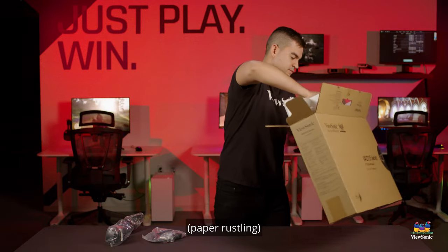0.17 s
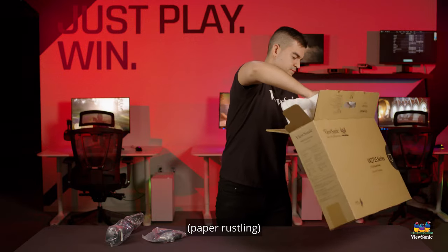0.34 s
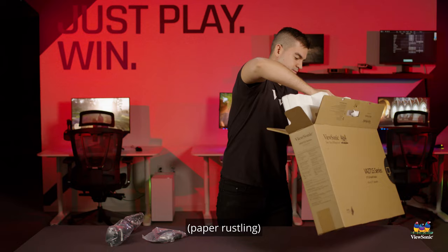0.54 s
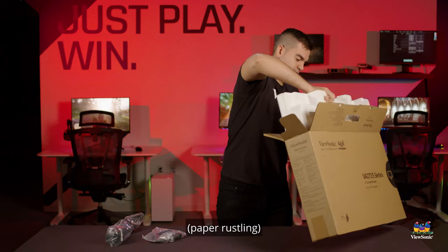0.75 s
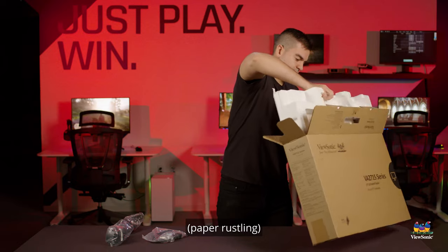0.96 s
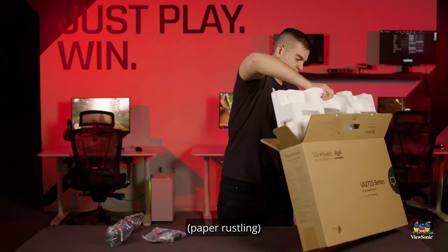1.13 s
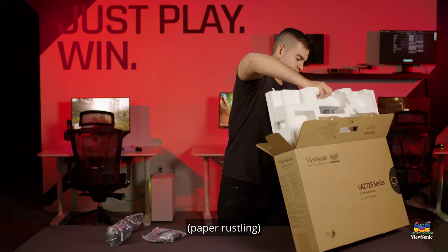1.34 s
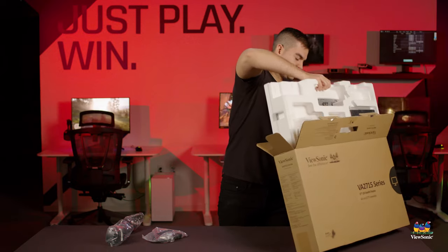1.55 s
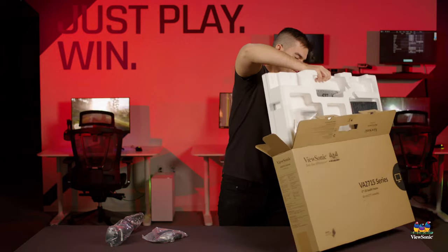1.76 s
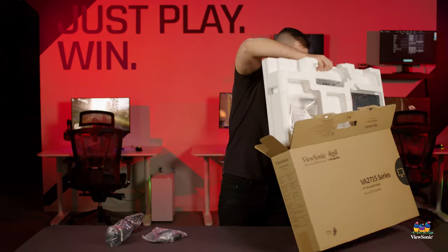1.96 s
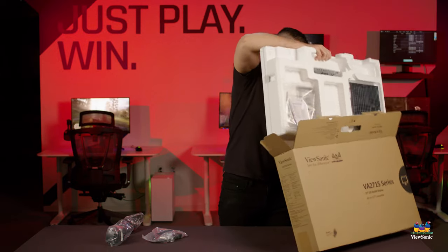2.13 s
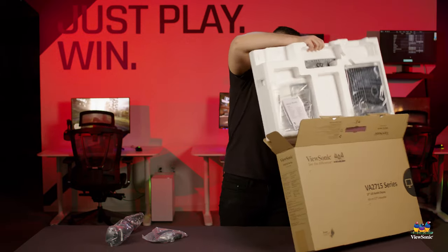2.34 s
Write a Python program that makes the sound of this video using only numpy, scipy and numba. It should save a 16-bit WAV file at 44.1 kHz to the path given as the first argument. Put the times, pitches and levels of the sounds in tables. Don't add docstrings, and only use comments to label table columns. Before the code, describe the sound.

Foam packing rubs and hisses as it slides out of a cardboard box, then a dull thump

```python
import sys
import numpy as np
from scipy import signal
from scipy.fft import rfft, irfft
from scipy.io import wavfile
from scipy.ndimage import uniform_filter1d
from numba import njit

SR = 44100
rng = np.random.default_rng(int(sys.argv[2]) if len(sys.argv) > 2 else 0)


def int16_out(signal):
    q = np.round(np.clip(np.atleast_2d(signal).T, -1, 1) * 32767)
    wavfile.write(sys.argv[1], SR, q.astype(np.int16))


def to_linear_factor(level_db):
    exponent = np.asarray(level_db, float) / 20
    return 10 ** exponent


N = 110250

# (time [s], level [dB], bead resonance strength [dB], sheen strength [dB])
FOAM_RUB = [(0, -33.5, -7, -3), (.22, -30, -5, -13), (.45, -32, -5.5, -8.5), (.8, -29, 4.7, -8),
            (1.12, -28.5, 2, -11.5), (1.2, -36, -7, -8), (1.25, -30.5, -11, -13), (1.28, -38, -4, -20),
            (1.31, -28, 2, -11.5), (1.54, -27.5, -5.5, -6.5), (1.6, -29.5, -2, -6.5),
            (1.69, -30, -10, -7.5), (1.73, -21.5, -6, -10), (1.78, -29, -25, -7), (1.919, -31.5, -25, -9),
            (2.03, -23, -1.5, -5), (2.105, -21, 3.5, -10), (2.13, -28.5, -3, -8), (2.19, -31, -23, -6),
            (2.23, -52, -16, -4)]
# (time [s], resonance [Hz])
BEAD_PITCH = [(0, 8900), (.18, 9900), (.7, 9230), (1.0, 9050), (1.64, 8850), (2.1, 9100)]
# (frequency [Hz], density [dB per Hz])
FOAM_TONE = [(4000, -17), (5000, -12), (6800, -5.5), (8500, -0.5), (10300, -3), (11500, -6), (15000, -13),
             (16000, -32)]
# (frequency [Hz], density [dB per Hz])
SHEEN_TONE = [(9500, -11.5), (11200, 1), (12200, -2), (13500, -2.5), (15300, -8), (16000, -24)]
# (time [s], resonance [Hz], strength [dB])
SHEEN_GLINT = [(0, 12800, -1), (.3, 11200, -15), (1.15, 11300, -16), (1.25, 12300, 2), (1.35, 11900, -10),
               (1.52, 12500, -2), (1.62, 11700, -8), (1.73, 11900, 4), (1.9, 11300, -3), (2.03, 12800, -8),
               (2.2, 12100, -6)]
# (time [s], level [dB], wall resonance [Hz])
CARD_SCRAPE = [(0, -40, 1900), (.45, -39, 1760), (.75, -34.5, 1780), (1.13, -38, 1850), (1.2, -42.5, 1850),
               (1.29, -42.5, 2120), (1.36, -37.5, 1940), (1.68, -37, 1940), (1.74, -34.5, 2060),
               (2.06, -35.5, 2300), (2.15, -44.5, 2280), (2.23, -48.5, 1980)]
# (frequency [Hz], density [dB per Hz])
CARD_TONE = [(300, -63), (1330, -24), (1560, -5.5), (2400, 0), (2900, -1), (3700, 2.5), (5000, -3),
             (7000, -5.5)]
# (time [s], level [dB], attack [s], hold [s], release [s])
FOAM_SCUFFS = [
    (2.3667, -34, 0.0027, 0.038, 0.034),
    (2.437, -32.5, 0.033, .06, .03),
]
# (frequency [Hz], density [dB per Hz])
SCUFF_TONE = [(590, -52), (1000, -30), (2080, -18.5), (2330, -9), (2650, -21), (3150, -14), (9720, -19.5),
              (11800, -1), (16000, -21)]
# (resonance [Hz], width [Hz], level [dB])
SCUFF_SQUEAKS = [
    [(8900, 470, -0.5), (13000, 900, -10), (10700, 900, -7)],
    [(2240, 120, -9), (7170, 300, -7), (8000, 390, -3)],
]
# (time [s], level [dB], card share [dB], crack centre [Hz], card ring [Hz])
FLAP_TICKS = [
    (0.218, -14, -16, 10600, 2000),
    (0.223, -17, -15, 9900, 2000),
    (.2255, -16.5, -2, 9800, 3270),
    (.2272, -19.5, -4.5, 9800, 1610),
    (.2295, -30, 4.5, 9900, 1380),
    (.24, -37, 14, 9000, 1370),
    (.2672, -12, -5.5, 8750, 1730),
    (.2712, -25.5, 5, 7800, 2280),
    (1.694, -30.5, 1.5, 4000, 1550),
    (2.366, -32, -21, 12000, 3220),
]
# (resonance [Hz], width [Hz], level [dB])
TICK_RATTLE = [(1420, 390, -4), (1960, 440, 3), (3100, 310, -1.5), (4360, 2300, -1.5)]
# (start [s], peak level [dB], pitch [Hz], swell [s], fade [s])
WALL_SWELLS = [(0.031, -48.5, 228, 0.09, 0.061), (0.226, -28.5, 190, 0.0032, 0.011),
               (.275, -30, 181, 0.007, 0.02), (0.269, -42, 90, 0.019, 0.031),
               (1.179, -30, 100, 0.024, 0.029), (1.284, -27.5, 116, 0.0021, 0.0066),
               (1.3185, -30.5, 116, .005, 0.0054), (1.359, -44.5, 190, 0.0083, 0.019),
               (1.735, -25.5, 339, 0.023, 0.021), (1.926, -22.5, 600, 0.0013, 0.007),
               (1.948, -37, 262, 0.0099, 0.012), (1.995, -31, 321, 0.0069, 0.0083),
               (2.021, -33, 238, 0.011, 0.005), (2.079, -26.5, 255, 0.018, 0.014),
               (2.155, -29, 264, 0.012, 0.011), (2.185, -27, 597, 0.0023, 0.011),
               (2.365, -33.5, 540, 0.0015, 0.0053), (2.36, -31, 116, 0.0056, 0.024),
               (2.41, -40.5, 721, 0.0036, 0.0085), (.227, -26.5, 520, 0.0026, 0.0047),
               (.27, -32, 780, 0.0034, 0.0034), (.002, -45.5, 570, 0.0098, 0.022),
               (.002, -49, 248, 0.013, 0.018), (.249, -33, 239, 0.0032, 0.0089),
               (.266, -27.5, 497, 0.0024, 0.0035), (1.254, -48, 180, 0.0079, .012),
               (1.284, -43, 320, 0.0028, .006), (1.297, -39, 226, .008, 0.0087),
               (1.335, -43, 186, .01, 0.017), (1.34, -50, 82, .015, 0.022), (1.801, -42, 355, 0.024, .03),
               (1.85, -51, 196, 0.012, 0.023), (2.125, -38.5, 574, .01, 0.019),
               (2.155, -39, 570, .008, .01), (2.384, -36, 100, 0.0056, 0.0097),
               (2.382, -41.5, 234, 0.0058, 0.055), (2.324, -29, 133, 0.0064, 0.0088),
               (2.2, -18, 75, 0.02, .04), (2.216, -24, 124, 0.012, 0.023), (2.27, -40.5, 401, 0.013, 0.024)]
# (time [s], level [dB])
CORNER_BUMPS = [
    (2.2001, -8.5),
    (2.212, -9.5),
    (2.223, -9.5),
    (2.236, -18.5),
    (2.249, -23),
    (2.28, -25.5),
    (2.3, -27),
]
# (frequency [Hz], level [dB], 60 dB decay [s])
BOX_MODES = [(65, -13, 0.11), (90, 2, 0.078), (104.5, -1.5, 0.13), (235.4, -2.5, 0.11), (304, -17, 0.13),
             (350, -8, 0.1), (408, -10, 0.085), (581, -15, 0.08), (716, -24.5, 0.06)]
# (frequency [Hz], density [dB per Hz])
SHUDDER_TONE = [(150, 0), (300, -1.5), (700, -12), (1200, -17.5), (2500, -23)]
# (time [s], wide walls [dB], narrow walls [dB])
WALL_HUM = [(1.67, -66, -50), (1.7, -69, -40.5), (1.76, -47, -41), (1.85, -55.5, -44.5), (1.95, -42, -52),
            (2.19, -38.5, -59), (2.3, -44.5, -78), (2.42, -48, -53), (2.5, -64, -54)]
# (resonance [Hz], width [Hz], level [dB])
WIDE_WALLS = [(190, 37, -10), (255, 62, 19), (327, 26, 3)]
# (resonance [Hz], width [Hz], level [dB])
NARROW_WALLS = [(597, 60, -6.5), (724, 750, 15), (814, 750, 4.5)]
# (frequency [Hz], level [dB])
ROOM_TONE = [(40, -6), (300, -3.5), (1000, -10), (3000, -3), (5000, -2), (16000, -7)]
# (frequency [Hz], density [dB per Hz])
FLOOR_TONE = [(30, -5.5), (55, -4.5), (120, -11), (300, -18.5), (800, -34), (2500, -29.5), (16000, -38)]

STOP_DB_PER_S = 412


def level(x, db):
    return x * to_linear_factor(db) / np.sqrt(np.mean(x ** 2))


def colour(x, points):
    hz, db = np.array(points).T
    bins = np.arange(N // 2 + 1) * SR / N + 1
    gain = to_linear_factor(np.interp(np.log(bins), np.log(hz), db, left=-60, right=-60))
    return level(irfft(rfft(x) * gain, N), 0)


@njit
def svf(x, hz, width):
    y, band, low = np.empty(len(x)), 0., 0.
    for i in range(len(x)):
        g = np.tan(np.pi * hz[i] / SR)
        k = width / hz[i]
        v = (band + g * (x[i] - low)) / (1 + g * (g + k))
        band = 2 * v - band
        low = low + 2 * g * v
        y[i] = k * v
    return y


def svf_twice(x, hz, width):
    return svf(svf(x, hz, width), hz, width)


def rings(x, table):
    return sum(to_linear_factor(db) * svf(x, np.full(N, 1. * hz), 1. * width) for hz, width, db in table)


def walk(rate):
    k = int(SR / rate)
    steps = np.repeat(rng.standard_normal(N // k + 1), k)
    return 1.35 * uniform_filter1d(uniform_filter1d(steps, k), k)[:N]


def slips(scatter_db, flicker_db, rate):
    clicks = rng.standard_normal(N)
    size_db = scatter_db * np.minimum(rng.exponential(size=N), 4)
    return clicks * to_linear_factor(size_db + flicker_db * walk(rate))


def slide(t):
    time, db, ring_db, sheen_db = np.array(FOAM_RUB).T
    db, ring_db, sheen_db = (np.interp(t, time, c) for c in (db, ring_db, sheen_db))
    db = db - STOP_DB_PER_S * np.maximum(t - time[-1], 0)

    bead_hz = np.interp(t, *np.array(BEAD_PITCH).T)
    bead_slips = slips(4.3, 1.07, 90)
    wander_hz = bead_hz * (1 + 0.03 * walk(50.5))
    ring = svf(svf(bead_slips, wander_hz, 1950.0), bead_hz, 3100.0)
    foam = colour(slips(2.6, 1.3, 59.68), FOAM_TONE) + to_linear_factor(ring_db) * level(ring, 0)
    foam /= np.sqrt(1 + to_linear_factor(2 * ring_db))

    sheen = to_linear_factor(sheen_db + 1.0) * colour(slips(1.6, 1.0, 70), SHEEN_TONE)
    glint_time, glint_hz, glint_db = np.array(SHEEN_GLINT).T
    glint = svf_twice(sheen, np.interp(t, glint_time, glint_hz), 1600.)
    sheen = sheen + to_linear_factor(np.interp(t, glint_time, glint_db) + 2) * glint
    return to_linear_factor(db) * (to_linear_factor(-0.5) * foam + sheen)


def scrape(t):
    time, db, wall_hz = np.array(CARD_SCRAPE).T
    db = np.interp(t, time, db) - STOP_DB_PER_S * np.maximum(t - time[-1], 0)
    wall_hz = np.interp(t, time, wall_hz)
    wall_slips = slips(2.5, 1.67, 39.55)
    wander_hz = wall_hz * (1 + 0.073 * walk(24.7))
    wall = svf(svf(wall_slips, wander_hz, 900.0), wall_hz, 870.0)
    return to_linear_factor(db) * (colour(slips(3.8, 1.07, 30.35), CARD_TONE) + level(wall, -6.0))


def scuffs(t):
    out = 0
    rub = colour(slips(2.3, 3.7, 50), SCUFF_TONE)
    squeak = slips(0, 2.6, 30.27)
    for (s, db, attack, hold, release), pitches in zip(FOAM_SCUFFS, SCUFF_SQUEAKS):
        fade = np.exp(-np.maximum(t - s - attack - hold, 0) / release)
        env = to_linear_factor(db) * np.clip((t - s) / attack, 0, 1) * fade
        out = out + env * (rub + to_linear_factor(7.5) * rings(squeak, pitches))
    return out


def settle(t):
    start_s, settle_db, bead_hz = 2.221, -23.5, 5070
    u = np.maximum(t - start_s, 0)
    env = (u > 0) * (np.exp(-u / 0.001) + to_linear_factor(-9) * np.exp(-u / 0.058))
    return to_linear_factor(settle_db) * svf_twice(env * rng.standard_normal(N), np.full(N, 1. * bead_hz), 2100.0)


def ticks(t):
    attack_s, crack_s, ring_s, rattle_db = 0.000063, 0.0024, 0.0016, 1.7
    noise = rng.standard_normal(N)
    crack_env, card_env, ring = 0, 0, 0
    centre_hz = np.full(N, 1. * FLAP_TICKS[0][3])
    for s, db, card_db, crack_hz, card_hz in FLAP_TICKS:
        u = np.maximum(t - s, 0)
        env = to_linear_factor(db) * np.minimum(u / attack_s, 1) * np.exp(-u / crack_s)
        crack_env = crack_env + env
        card_env = card_env + env * to_linear_factor(card_db)
        ring = ring + to_linear_factor(db + card_db) * np.exp(-u / ring_s) * np.sin(2 * np.pi * card_hz * u)
        centre_hz[t >= s] = crack_hz
    crack = svf_twice(crack_env * noise, centre_hz, 4700.0)
    return to_linear_factor(4.5) * crack + ring + to_linear_factor(rattle_db) * rings(card_env * noise, TICK_RATTLE)


def panels(t):
    sag_per_s = 2.2
    out = 0
    for s, db, hz, swell, fade in WALL_SWELLS:
        u = np.maximum(t - s, 0)
        rise = np.sin(np.pi / 2 * np.minimum(u / swell, 1)) ** 2
        env = rise * np.exp(-(np.maximum(u - swell, 0) / fade) ** 1.17)
        sag = 1 - sag_per_s * (100 / hz) ** 2 * np.minimum(u, .2) / 2
        out = out + to_linear_factor(db) * env * np.sin(2 * np.pi * hz * u * sag)
    return out


def thump(t):
    contact_s, shudder_db, shudder_attack_s, shudder_s = 0.0028, -35.5, 0.0068, .045
    landing = CORNER_BUMPS[0][0]
    out, k = np.zeros(N), int(landing * SR) - SR // 20
    uneven = rng.standard_normal((len(CORNER_BUMPS), len(BOX_MODES)))
    for (s, db), chances in zip(CORNER_BUMPS, uneven):
        u = np.maximum(t[k:] - s, 0)
        for (hz, mode_db, t60), chance in zip(BOX_MODES, chances):
            rise = np.sin(np.pi / 2 * np.minimum(u / (contact_s + 0.59 / hz), 1)) ** 2
            decay = np.exp(-np.log(1000) * u / t60)
            out[k:] += to_linear_factor(db + mode_db + 2.0 * chance) * rise * decay * np.sin(2 * np.pi * hz * u)
    u = np.maximum(t - landing, 0)
    env = np.minimum(u / shudder_attack_s, 1) * np.exp(-u / shudder_s)
    shudder = env * colour(slips(1.5, 3.0, 80), SHUDDER_TONE)
    return out * .5 + to_linear_factor(shudder_db) * shudder


def hum(t):
    time, wide_db, narrow_db = np.array(WALL_HUM).T
    wide = level(rings(slips(0, 3.3, 50), WIDE_WALLS), 0)
    narrow = level(rings(slips(0, 0.96, 40.4), NARROW_WALLS), 0)
    return to_linear_factor(np.interp(t, time, wide_db)) * wide + to_linear_factor(np.interp(t, time, narrow_db)) * narrow


def room(near, t):
    t60_s, room_db = 0.38, -15.5
    u = t[:SR // 2]
    decay = np.exp(-np.log(1000) * u / t60_s) * (u > .004)
    tail = colour(rng.standard_normal(N), ROOM_TONE)[:len(u)] * decay
    return to_linear_factor(room_db) * signal.fftconvolve(near, tail / np.sqrt(np.sum(tail ** 2)))[:N]


def studio_floor():
    return to_linear_factor(-55.5 + 1.0 * walk(5.24)) * colour(rng.standard_normal(N), FLOOR_TONE)


def scene():
    t = np.arange(N) / SR
    rubbing = slide(t) + scrape(t) + scuffs(t) + settle(t)
    near = rubbing + ticks(t) + panels(t) + thump(t) + hum(t)
    return np.tile(near + room(near, t) + studio_floor(), (2, 1))


def top_cut(x):
    return signal.sosfilt(signal.butter(12, 16930, fs=SR, output="sos"), x)


def record(dry):
    low_pass = signal.ellip(8, .2, 70, 15850, fs=SR, output="sos")
    return top_cut(signal.sosfilt(low_pass, dry))


dry = scene()
out = record(dry)
int16_out(out)
```